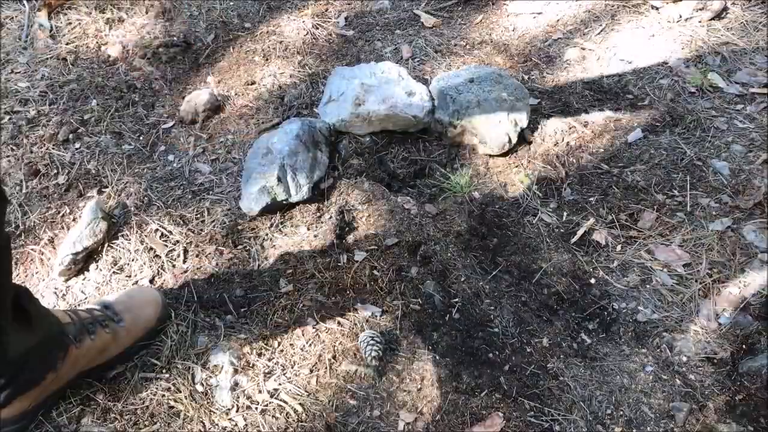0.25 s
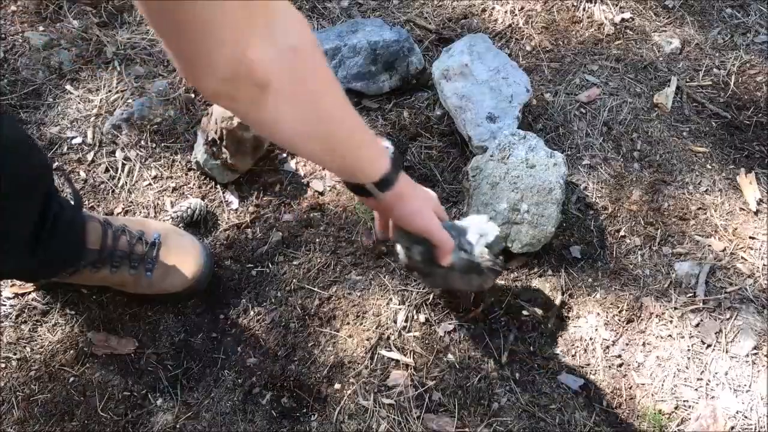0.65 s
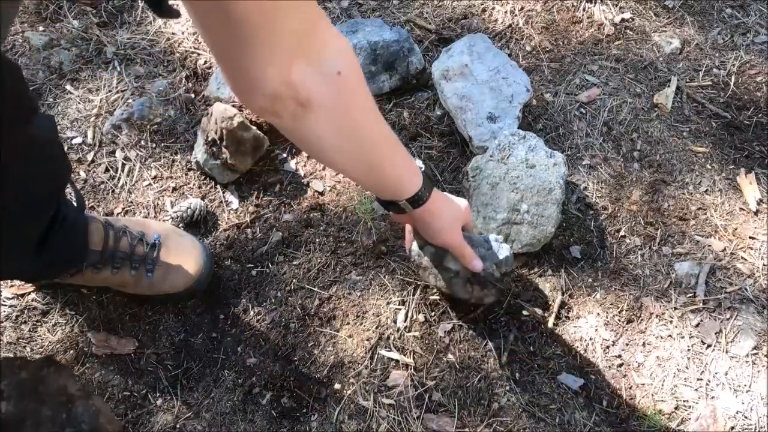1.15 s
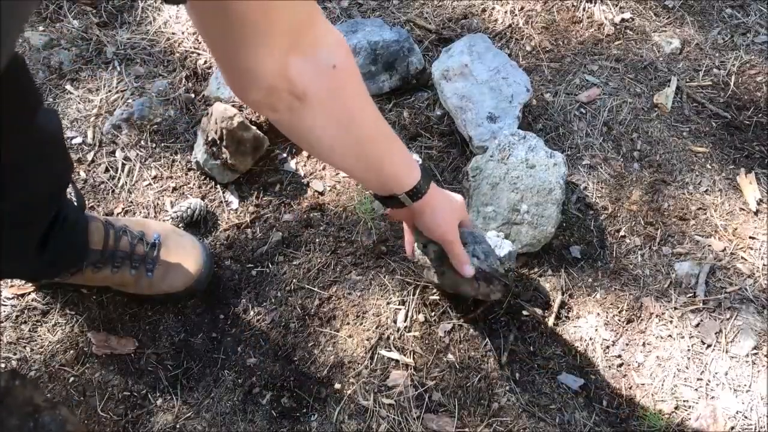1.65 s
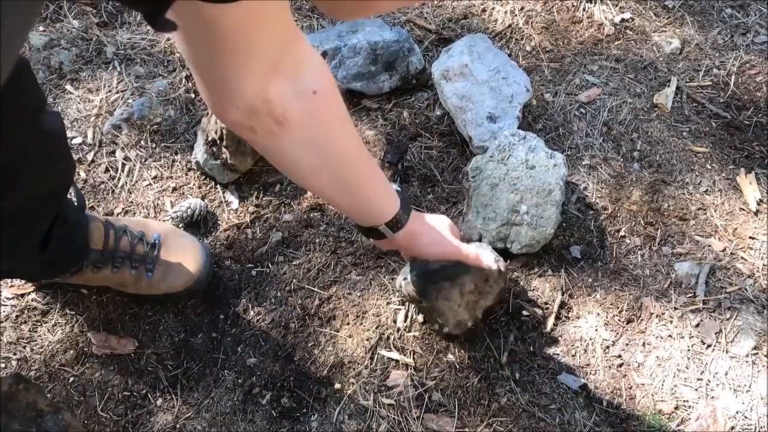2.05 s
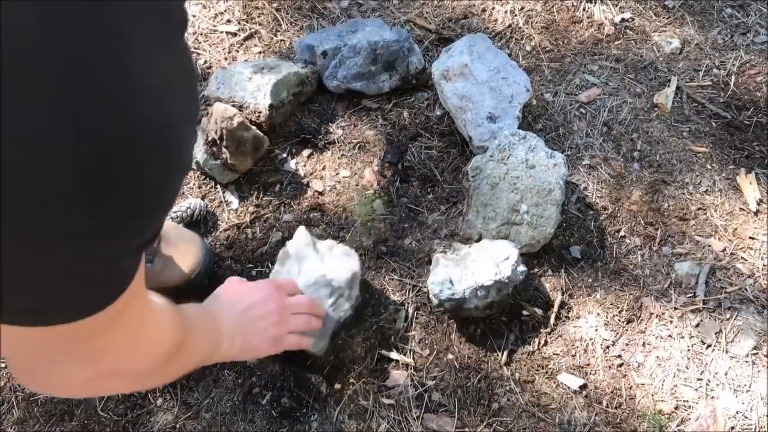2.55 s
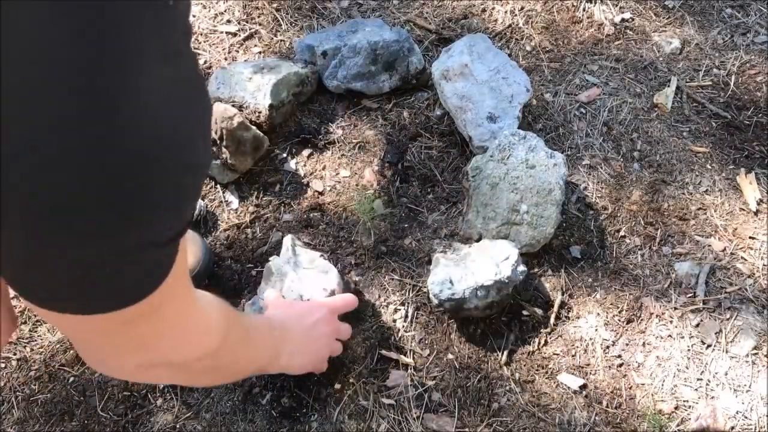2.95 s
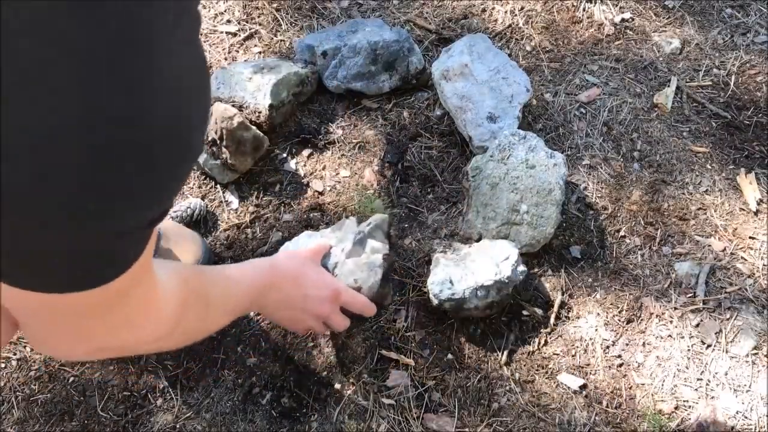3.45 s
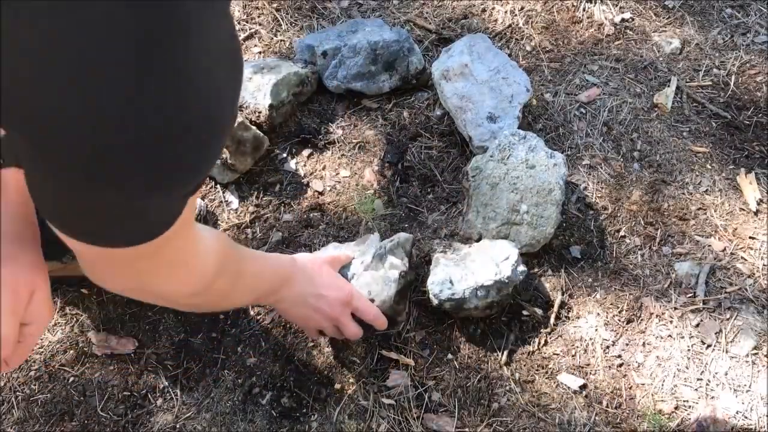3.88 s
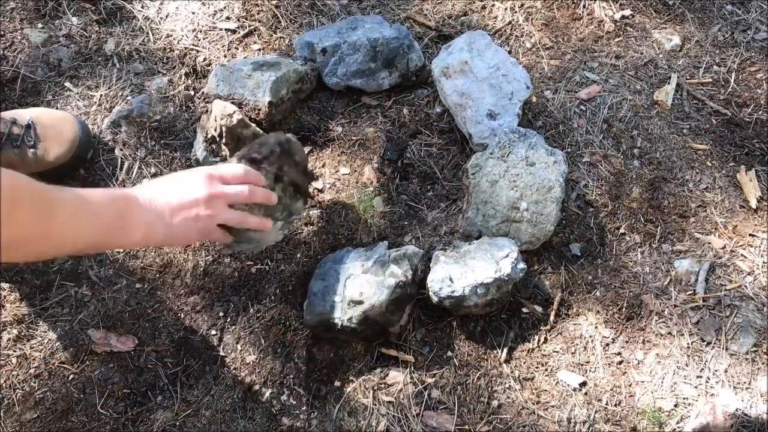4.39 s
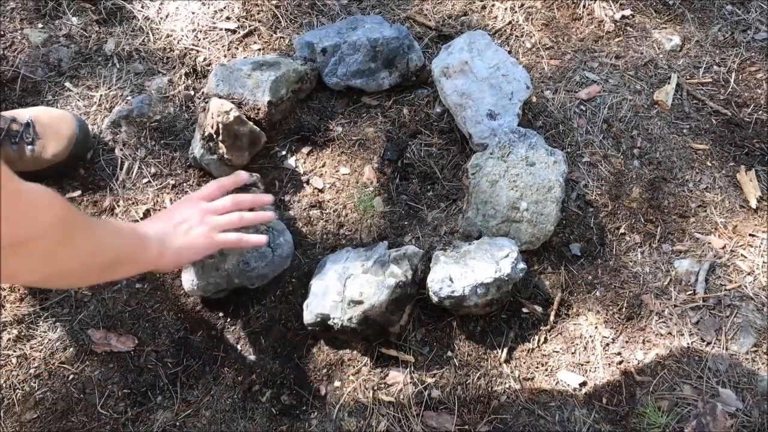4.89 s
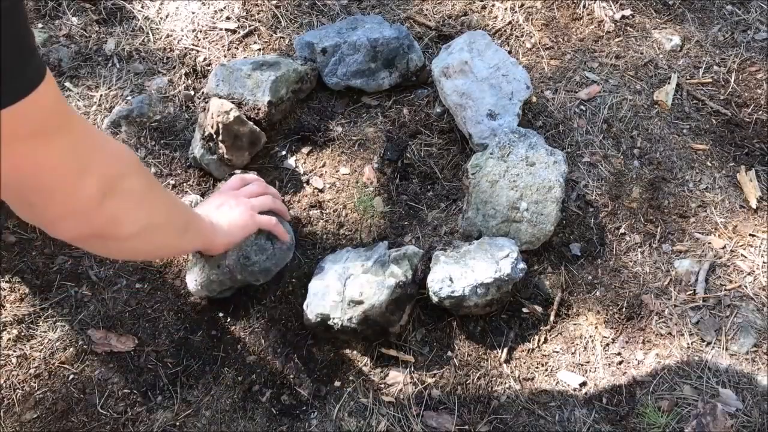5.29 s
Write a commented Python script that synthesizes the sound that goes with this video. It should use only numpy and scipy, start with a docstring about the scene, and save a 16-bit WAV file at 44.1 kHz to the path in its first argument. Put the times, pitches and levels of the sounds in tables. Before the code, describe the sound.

Someone places rocks by hand on needle-covered earth. The loudest clack comes just before one second; gritty knocks and soft thumps follow at about two and two and a half, dry snaps near four, and a strong sharper knock after that. Quiet rustles, scuffs and soft footfalls fill the gaps. Mono, close and dry, with a thin tail from the trees and low outdoor rumble.

```python
"""Dry litter rustles and a foot shifts, then stone meets stone in a short dead clack, close to the microphone.
Rocks are being set down by hand in a ring on dry forest ground. Each clack is a short filtered pulse
with brief ringing and cracking; each landing or step is a decaying low swing of the soil with a dull slap.
Twigs, needles and crumbs are bursts of coloured noise. The trees return a faint noise-like tail,
and a low rumble lies behind it all."""
import sys
import numpy as np
from scipy import signal
from scipy.fft import rfft, irfft
from scipy.io import wavfile

SR = 44100
rng = np.random.default_rng(int(sys.argv[2]) if len(sys.argv) > 2 else 0)


def master_out(mix):
    """Clip the mix to full scale and print it as 16-bit PCM to the path in sys.argv[1]."""
    frames = np.transpose(np.atleast_2d(mix))
    ceiling = np.clip(frames, -1, 1)
    pcm = np.round(ceiling * 32767).astype(np.int16)
    wavfile.write(sys.argv[1], SR, pcm)


N = 243720  # length of the scene in samples
TIME = np.arange(N) / SR  # seconds through the scene
HIT_T = np.arange(SR // 2) / SR  # seconds within one blow


def from_db(db):
    """Turn decibels into a gain."""
    return 10 ** (np.asarray(db) / 20)


def rms_one(x):
    """Scale to an rms (average strength) of 1."""
    return x / np.sqrt(np.mean(x ** 2) + 1e-20)


def peak_one(x):
    """Scale to a peak of 1."""
    return x / (np.abs(x).max() + 1e-20)


def fade(t60):
    """Die away steadily within one blow, losing 60 dB in t60 seconds."""
    return from_db(-60 * np.minimum(HIT_T / t60, 5))


def add(out, s, sound):
    """Mix a sound in at time s, in seconds."""
    at = max(round(s * SR), 0)
    out[at:at + len(sound)] += sound[:max(N - at, 0)]


def colour(x, spectrum):
    """Boost or cut each pitch range of a sound as the spectrum says, then scale to rms 1."""
    hz, db = np.transpose(spectrum)
    bins = np.maximum(np.fft.rfftfreq(len(x), 1 / SR), 1)
    gain = from_db(np.interp(np.log(bins), np.log(hz), db))
    return rms_one(irfft(rfft(x) * gain, len(x)))


def noise(spectrum, size):
    """Make coloured noise of rms 1."""
    return colour(rng.standard_normal(size), spectrum)


def band(x, low_hz, high_hz, order=2):
    """Keep the pitches between two edges, without any sound before its cause."""
    edges = [low_hz, min(high_hz, SR / 2 - 500)]
    return signal.sosfilt(signal.butter(order, edges, "band", fs=SR, output="sos"), x + 1e-18)


def drift(rate):
    """Wander at random around 0, with rate new values per second (200 at most)."""
    return np.interp(TIME * min(rate, 200), np.arange(1200), rng.standard_normal(1200))


def grains(size, spread_db):
    """Make tiny fractures of very uneven strength."""
    strength = from_db(spread_db * np.clip(rng.standard_normal(size), -2, 2))
    return rng.standard_normal(size) * strength


# stone on stone: start_s, level_db (peak of the jolt), pitch_hz, crack_db (relative to the jolt, before trims)
STONE_KNOCKS = [(0.404, -49.5, 1010, -4), (0.754, -53.5, 640, -25), (0.856, -58, 1180, -21),
                (0.8673, -56, 1190, -22), (0.8787, -8.5, 1034, -20.5), (0.8865, -31.5, 740, -8.5),
                (0.921, -42, 480, -22.5), (1.261, -46.5, 720, -18), (1.843, -54, 1600, -13),
                (1.856, -46.5, 1696, -14), (2.0839, -20.5, 930, -21), (2.0911, -32.5, 875, -18),
                (2.1153, -28, 750, -14.5), (2.1186, -32.5, 870, -10), (2.321, -54, 560, -5.5),
                (2.5501, -25, 710, -19.5), (4.404, -51.5, 600, -6.5), (4.658, -21.5, 1260, -35.5),
                (4.6600, -17.5, 2130, -33.5), (4.6601, -22.5, 900, -34), (4.722, -50.5, 956, -20),
                (4.7505, -52.5, 945, -30), (4.865, -46, 722, -9.5), (5.426, -55.5, 853, -15)]
# a rock bedded in hand or soil rings briefly: pitch_hz, level_db (relative to the jolt, before trims), t60_s
ROCK_RINGING = [(285.5, -28, 0.015), (388.6, -25, 0.05), (503, -23, 0.055), (750, -29, 0.02),
                (924, -18, 0.034), (1350, -29.5, 0.023), (1520, -27, .025), (3050, -38, 0.052),
                (3370, -38, .04), (3800, -39.5, 0.031), (4080, -44, .04), (5900, -45.5, 0.049)]
# relative colour of the gritty crack: pitch_hz, level_db
CRACK_COLOUR = [(300, -10), (900, -10.5), (1800, 1.5), (3100, -3), (4000, -5.5), (5500, -9.5),
                (8000, -20.5), (15000, -22.5)]
# a grittier contact is also a broader one: its width in octaves doubles with every 15.5 dB of crack
USUAL_CRACK_DB, USUAL_OCTAVES, OCTAVES_DOUBLE_DB = -20.5, 0.97, 15.5


def knocks(crack_t60=0.031, grit_db=-8, chip_db=2, chip_low_hz=2200, chip_high_hz=3800,
           scatter_db=-24, scatter_t60=0.034, echo_s=0.0029, echo_db=-11,
           softness=1.78, ring_db=-2, uneven_db=5.0):
    """The jolt of two rocks sends out a short pulse; they ring briefly and their rough faces crack."""
    out = np.zeros(N)
    click = signal.unit_impulse(len(HIT_T))
    mode_hz, mode_db, mode_t60 = np.transpose(ROCK_RINGING)
    modes = np.sin(2 * np.pi * mode_hz[:, None] * HIT_T) * fade(mode_t60[:, None])
    # a high point chips at first touch
    chip = from_db(chip_db) * peak_one(band(click, chip_low_hz, chip_high_hz))
    for s, db, hz, crack_db in STONE_KNOCKS:
        octaves = USUAL_OCTAVES * 2 ** ((crack_db - USUAL_CRACK_DB) / OCTAVES_DOUBLE_DB)
        low_hz, high_hz = hz / 2 ** (octaves / 2), hz * 2 ** (octaves / 2)
        # the contact lasts a finite time, which rounds off the top
        jolt = peak_one(band(band(click, low_hz, high_hz), 30, softness * hz, order=3))
        # each blow excites the rock unevenly, and less so far above the contact pitch
        mode_gain = from_db(ring_db + mode_db + uneven_db * rng.standard_normal(len(ROCK_RINGING)))
        ringing = (mode_gain / np.hypot(1, mode_hz / (3 * hz))) @ modes
        # grit is crushed between the faces
        grit = from_db(grit_db) * colour(grains(len(HIT_T), spread_db=3.5), CRACK_COLOUR) * fade(crack_t60)
        blow = jolt + from_db(crack_db) * (chip + grit) + ringing
        # the ground echoes the pulse and the neighbouring stones scatter it
        scatter = rms_one(band(rng.standard_normal(len(HIT_T)), low_hz / 2, high_hz, order=3))
        scatter = scatter * fade(scatter_t60)
        echo = from_db(echo_db) * jolt + from_db(scatter_db) * scatter
        add(out, s, from_db(db) * blow)
        add(out, s + echo_s, from_db(db) * echo)
    return out


# a rock's weight lands on the soil: start_s, level_db (size of the bounce), pitch_hz (of the bounce),
# slap_db (relative to the bounce, before trims), settle_db (relative to the bounce), settle_swell_s
ROCK_LANDINGS = [(0.8827, -32.5, 115, -2, -6, 0.019), (0.920, -43, 139, -9, -7, 0.018),
                 (1.260, -56, 91, -3, -8, .01), (2.090, -44.5, 100, -5, -12, 0.0054),
                 (2.1159, -31.5, 71.5, -9, -5, 0.0064), (2.5516, -29, 74, -1.5, -6, 0.0073),
                 (4.66, -24, 84, -7, -16.5, 0.01)]
THUD_SWELL_CYCLES = 0.45  # the bounce is strongest after this many of its own cycles
# the rock then settles in one slower sway, strongest SETTLE_S after the landing
SETTLE_S, SETTLE_HZ, SETTLE_SLAP_DB = 0.036, 61, -25


def landings():
    """Each rock thuds down, then sways to rest: presses of (start s, level dB, pitch Hz, swell s, slap dB)."""
    presses = []
    for s, db, hz, slap_db, settle_db, swell_s in ROCK_LANDINGS:
        presses.append((s, db, hz, THUD_SWELL_CYCLES / hz, slap_db))
        presses.append((s + SETTLE_S - swell_s, db + settle_db, SETTLE_HZ, swell_s, SETTLE_SLAP_DB))
    return presses


# relative colour of packed soil slapped flat: pitch_hz, level_db
SLAP_COLOUR = [(60, -19.5), (140, 1.5), (200, -1), (280, -1.5), (400, -4), (600, -13.5), (1200, -28),
               (3000, -58.5)]
# the crust of the soil gives a short hollow knock: pitch_hz, level_db (relative to the slap level), t60_s
SOIL_CRUST = [(154.7, -1.5, 0.047), (283, 0, 0.04)]


def soil(presses, slap_t60=0.038, slap_noise_db=-3, slap_rise_s=0.0012):
    """A weight on springy soil swings up and down as it dies away, and the contact slaps dully."""
    out = np.zeros(N)
    crust = sum(from_db(db) * np.sin(2 * np.pi * hz * HIT_T) * fade(t60) for hz, db, t60 in SOIL_CRUST)
    slap_shape = fade(slap_t60) * (1 - np.exp(-HIT_T / slap_rise_s))
    for s, db, hz, swell_s, slap_db in presses:
        age = np.minimum(HIT_T / swell_s, 40)
        # the swing grows until swell_s, then dies away
        bounce = -np.sin(2 * np.pi * hz * HIT_T) * age * np.exp(1 - age)
        slap = from_db(slap_noise_db) * noise(SLAP_COLOUR, size=len(HIT_T)) * slap_shape
        add(out, s, from_db(db) * (bounce + from_db(slap_db) * (slap + crust)))
    return out


# twigs and grit snap: start_s, level_db (peak of the tick)
TWIG_SNAPS = [(0.4259, -42), (1.381, -60), (2.1102, -47), (2.1224, -37), (2.5395, -41), (2.768, -44),
              (2.824, -47), (3.012, -50), (3.7698, -28), (3.8254, -41.5), (4.3004, -49), (4.404, -50),
              (4.5944, -40.5)]
# relative colour of a snap: pitch_hz, level_db
SNAP_COLOUR = [(200, -1), (1000, -1.5), (4000, -3.5), (6000, -5.5), (9000, -2.5), (13000, -2.5),
               (16000, 4.5)]
# crumbling grows more slowly than the snap: dB at a usual snap, and dB per dB of snap
USUAL_SNAP_DB, CRUMBLE_DB, CRUMBLE_FOLLOWS = -46.5, -58, 0.76


def snaps(snap_t60=0.0057, crumble_t60=0.051, strain_db=-8, strain_s=0.011, lead_s=0.03):
    """A dry twig crackles under strain, breaks with one bright tick and crumbles briefly."""
    out = np.zeros(N)
    since = HIT_T - lead_s  # seconds since the break
    strain = from_db(strain_db) * np.exp(-np.abs(since) / strain_s)
    crumble = from_db(-60 * np.abs(since) / crumble_t60)
    swell = np.where(since < 0, strain, crumble)
    for s, db in TWIG_SNAPS:
        tick = peak_one(noise(SNAP_COLOUR, size=len(HIT_T)) * fade(snap_t60))
        crumbs = colour(grains(len(HIT_T), spread_db=16.0), SNAP_COLOUR) * swell
        crumbs_db = CRUMBLE_DB + CRUMBLE_FOLLOWS * (db - USUAL_SNAP_DB)
        add(out, s, from_db(db) * tick)
        add(out, s - lead_s, from_db(crumbs_db) * crumbs)
    return out


# feet shift on the ground: start_s, level_db (size of the heel's bounce), pitch_hz, sole_db (relative to the heel)
FOOT_STEPS = [(0.255, -49, 81.5, -15), (0.5, -52, 63.5, -10), (2.275, -51, 66, -1.5),
              (2.711, -45, 53.3, -11), (2.903, -52, 68.5, 2), (3.579, -44, 89, -12),
              (3.797, -51, 65, -21.5), (4.091, -48, 67, -3.5), (4.403, -45, 51.7, 0.5),
              (4.524, -49.5, 50.4, 2), (5.078, -49, 67.4, 4)]
STEP_SWELL_S, SOLE_AFTER_S, STEP_SLAP_DB = 0.0085, 0.035, -22


def footfalls():
    """Each step presses the soil softly twice, heel then sole; lists presses for soil()."""
    presses = []
    for s, db, hz, sole_db in FOOT_STEPS:
        presses.append((s, db, hz, STEP_SWELL_S, STEP_SLAP_DB))
        presses.append((s + SOLE_AFTER_S, db + sole_db, hz, STEP_SWELL_S, STEP_SLAP_DB))
    return presses


# a rock or a sole drags over dry needles: start_s, level_db (before the clumping), length_s
NEEDLE_SCUFFS = [(0.486, -62, 0.16), (1.222, -76, .18), (1.783, -67.5, .19), (2.025, -71.5, 0.082),
                 (2.764, -68.5, 0.12), (3.005, -73, 0.15), (4.413, -67, 0.1), (4.589, -66, 0.049),
                 (4.826, -58, 0.038), (5.319, -73, 0.043)]
# relative colour of a drag: pitch_hz, level_db
SCUFF_COLOUR = [(200, 14), (1000, 5), (2500, 4), (6000, 4.5), (10000, -1), (13000, 2.5), (16000, -5)]


def scuffs(clump_db=3):
    """Each drag swells quickly and dies away in clumps of fine crackle."""
    pressure = np.zeros(N)
    for s, db, length in NEEDLE_SCUFFS:
        progress = HIT_T[HIT_T < length] / length
        add(pressure, s, from_db(db) * np.sin(np.pi * np.sqrt(progress)))
    clumps = from_db(clump_db * np.tanh(drift(160)))
    return pressure * clumps * colour(grains(N, spread_db=6), SCUFF_COLOUR)


# a boot rolls over dry crumbs and twigs: start_s, level_db, length_s
BOOT_CRUNCHES = [(0.224, -68, 0.27), (4.396, -68, 0.093)]
# relative colour of breaking crumbs, here and in the litter: pitch_hz, level_db
CRUMB_COLOUR = [(150, -15.5), (500, -3.5), (1100, -0.5), (2000, -9), (5500, -14), (12000, -24.5)]


def crunches(breaks_per_s=130, late_peak=1.6):
    """The weight on a boot builds and lets go, and crumbs break under it one by one."""
    load = np.zeros(N)
    for s, db, length in BOOT_CRUNCHES:
        progress = HIT_T[HIT_T < length] / length
        add(load, s, from_db(db) * np.sin(np.pi * progress ** late_peak))
    breaks = grains(N, spread_db=3) * (rng.random(N) < breaks_per_s / SR)
    return load * colour(breaks, CRUMB_COLOUR)


# clothes and dry litter stir: start_s, rustle_level_db, needle_level_db (both before each layer's trim)
LITTER_STIR = [(0.03, -70, -71.5), (0.43, -67.5, -77.5), (0.72, -70, -73), (1.04, -75.5, -80.5),
               (1.59, -78, -84.5), (2.0, -77.5, -80.5), (2.22, -75.5, -84.5), (2.51, -79.5, -81.5),
               (2.68, -75, -77), (2.85, -73.5, -81), (3.29, -79.5, -84), (4.32, -78.5, -85.5),
               (4.56, -71.5, -72.5), (4.71, -69.5, -71), (4.9, -73.5, -80), (5.53, -76.5, -79.5)]
# relative colour of the soft rustle: pitch_hz, level_db
LITTER_COLOUR = [(88, -35.5), (150, -7.5), (240, 5), (407, 0), (562, 0), (680, -2.5), (1010, -2),
                 (1790, -7), (5000, -20.5), (6500, -40), (11000, -120)]
# relative colour of dry needles: pitch_hz, level_db
NEEDLE_COLOUR = [(1470, -26), (2500, -5), (5520, -5.5), (6970, -4.5), (7710, -10.5), (8660, -4.5),
                 (10400, -10.5), (11300, -7), (15200, -6), (16000, -14)]
CRUMB_RATE_FOLLOWS = 1.2  # the more stirring, the more crumbs: dB of rate per dB of rustle


def litter(rustle_db=-1, hiss_db=2.0, crackle_db=-9, crackles_per_s=120, flutter_db=0.03,
           crumb_db=-10, crumbs_per_s=70):
    """Cloth and leaf litter rustle and crumbs of soil tick; single needles crackle over their own hiss."""
    s, soft_db, bright_db = np.transpose(LITTER_STIR)
    soft_db = np.interp(TIME, s, soft_db)
    bright_db = np.interp(TIME, s, bright_db)
    rustle = from_db(rustle_db + flutter_db * drift(40)) * noise(LITTER_COLOUR, size=N)
    crumb_rate = crumbs_per_s * from_db(CRUMB_RATE_FOLLOWS * (soft_db - soft_db.mean()))
    crumbs = colour(grains(N, spread_db=5) * (rng.random(N) < crumb_rate / SR), CRUMB_COLOUR)
    crackle = colour(grains(N, spread_db=5.5) * (rng.random(N) < crackles_per_s / SR), NEEDLE_COLOUR)
    hiss = from_db(hiss_db) * noise(NEEDLE_COLOUR, size=N)
    soft = from_db(soft_db) * (rustle + from_db(crumb_db) * crumbs)
    bright = from_db(bright_db) * (hiss + from_db(crackle_db) * crackle)
    return soft + bright


# relative colour of the tail from the trees: pitch_hz, level_db
TREE_COLOUR = [(150, -1), (500, -5.5), (1100, -7), (2500, -7.5), (6000, -13.5), (15000, -20)]


def forest(x, wet_db=-38.0, t60=0.19, first_echo_s=0.012):
    """Trunks send back a thin, dull tail, made by smearing the sound with fading noise."""
    shape = fade(t60) * (1 - np.exp(-HIT_T / first_echo_s))
    echoes = colour(grains(len(HIT_T), spread_db=0.5), TREE_COLOUR) * shape
    return from_db(wet_db) * signal.fftconvolve(x, echoes / np.linalg.norm(echoes))[:N]


# slow rise and fall of the low rumble: start_s, level_db (before rumble_db and the random sway)
RUMBLE_SWAY = [(0.0, -76), (1.09, -70.5), (1.85, -77), (2.65, -69.5), (4.37, -72), (4.59, -65), (5.14, -70),
               (5.53, -75)]
# relative colour of the rumble: pitch_hz, level_db
RUMBLE_COLOUR = [(15, -30), (30, -7.5), (45, 2), (62, 0), (80, -9), (110, -14), (200, -21.5), (310, -22),
                 (450, -27), (700, -32.5), (1500, -62.5)]


def air(rumble_db=4.5, sway_db=2.0):
    """Low, lumpy outdoor rumble: deep noise whose level wanders."""
    level_db = np.interp(TIME, *np.transpose(RUMBLE_SWAY))
    return from_db(level_db + rumble_db + sway_db * drift(10)) * noise(RUMBLE_COLOUR, size=N)


def scene():
    """Mix rocks, ground and litter; the trees answer only the rocks, their landings and the snaps."""
    blows = knocks() + soil(landings()) + snaps()
    feet = soil(footfalls()) + scuffs() + crunches()
    mix = blows + forest(blows) + feet + litter() + air()
    return mix[None]  # one channel


CUTOFF_HZ = 15900  # top of the sound


def record(dry):
    """The microphone sheds the deepest bass, below about 32 Hz, and the top is cut."""
    lean = signal.sosfilt(signal.butter(2, 32, "high", fs=SR, output="sos"), dry)
    return signal.sosfilt(signal.ellip(10, .1, 70, CUTOFF_HZ, fs=SR, output="sos"), lean)


dry = scene()
out = record(dry)
master_out(out)
```